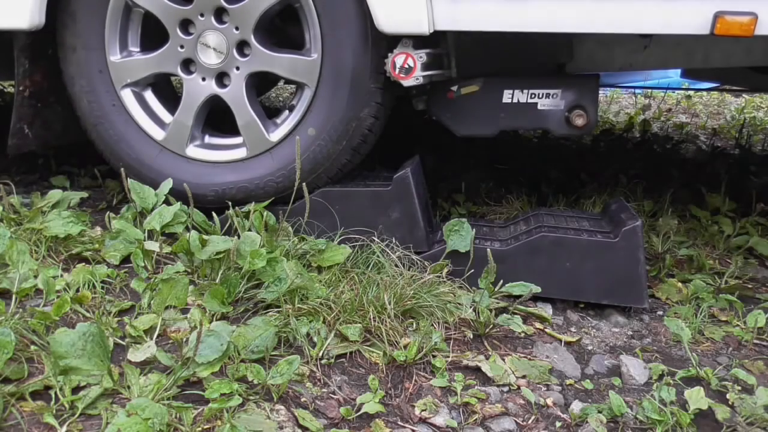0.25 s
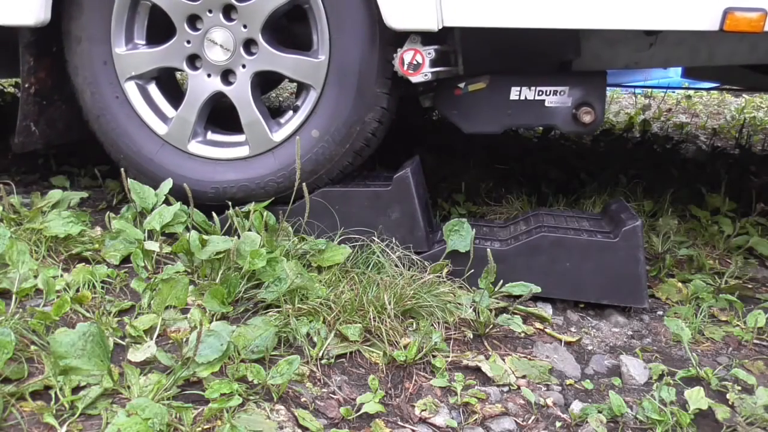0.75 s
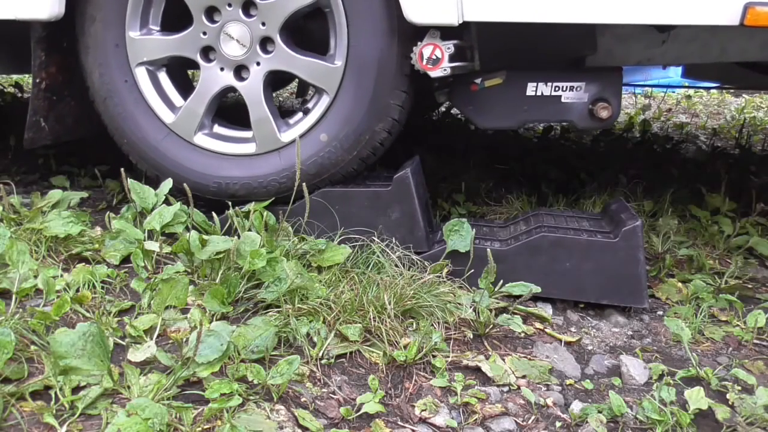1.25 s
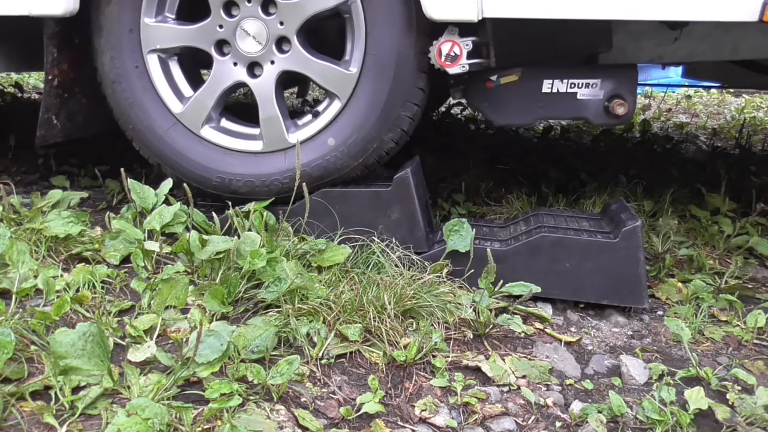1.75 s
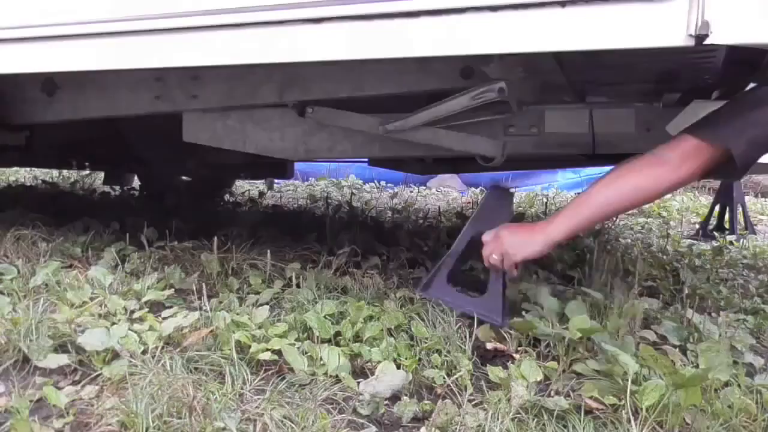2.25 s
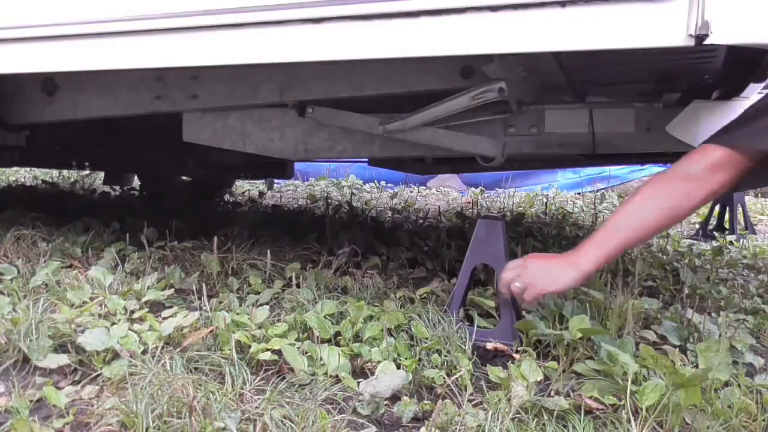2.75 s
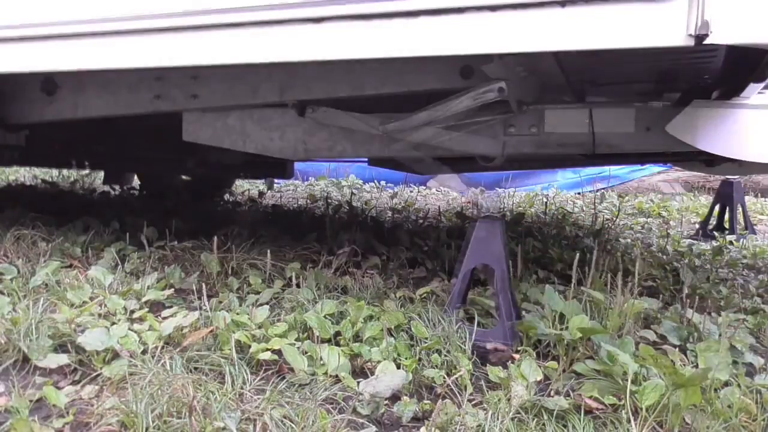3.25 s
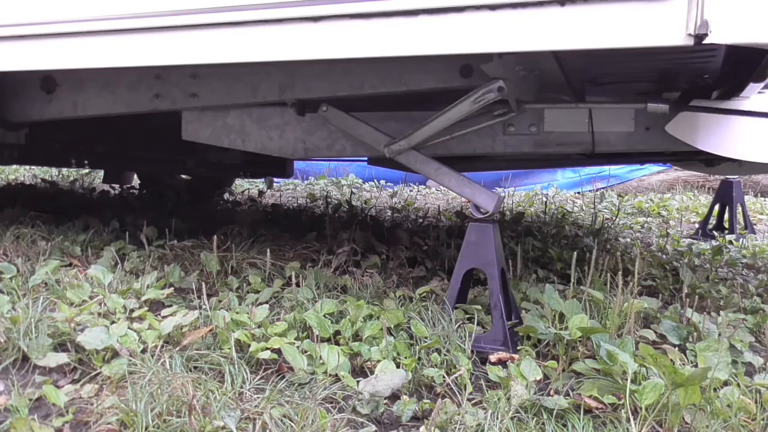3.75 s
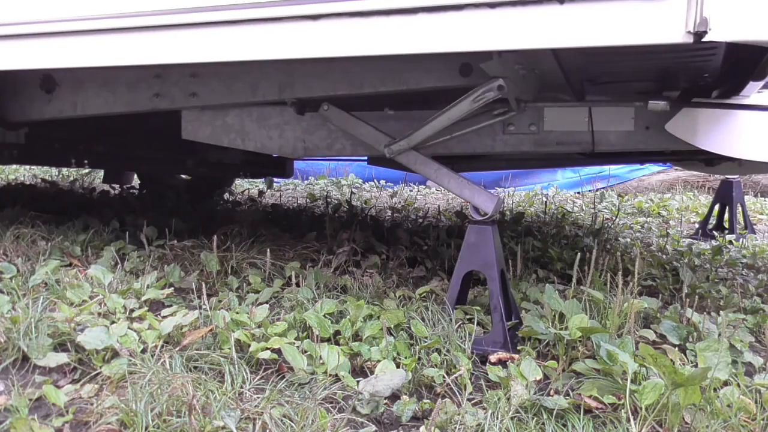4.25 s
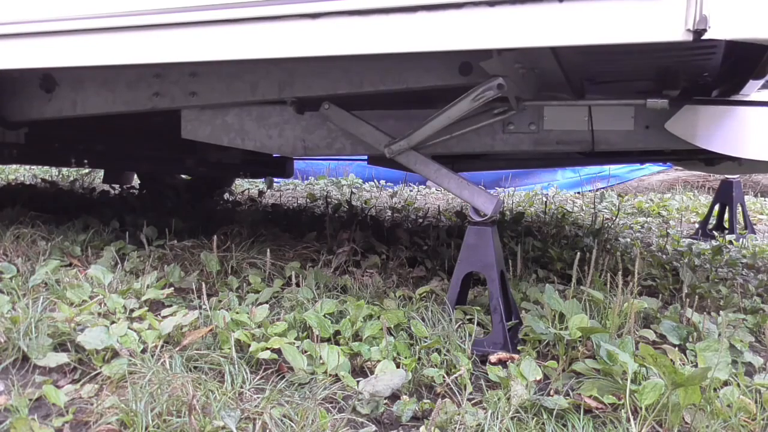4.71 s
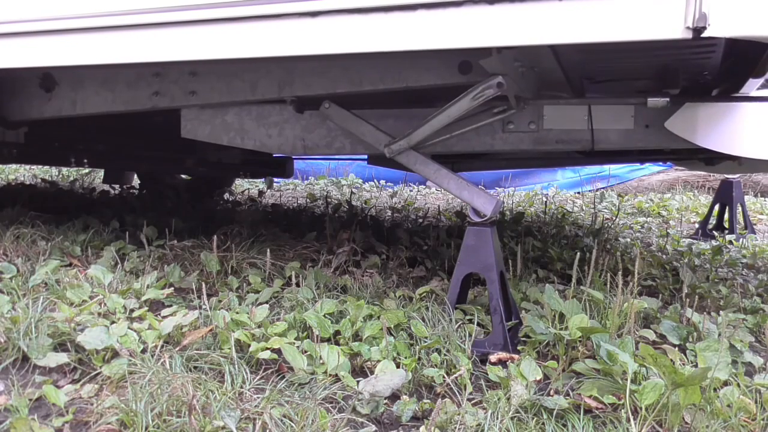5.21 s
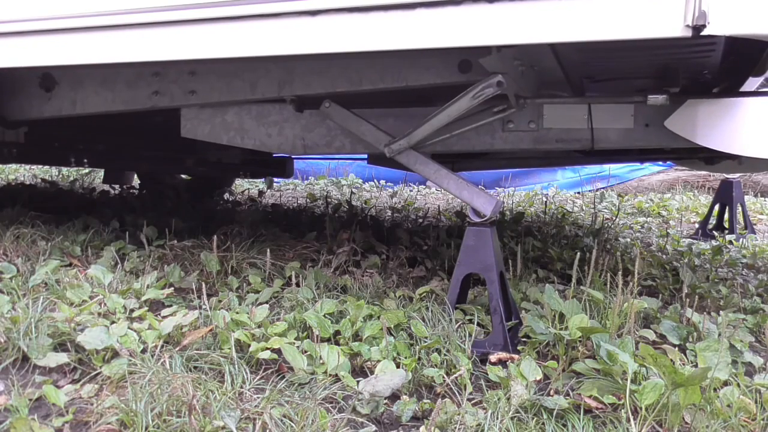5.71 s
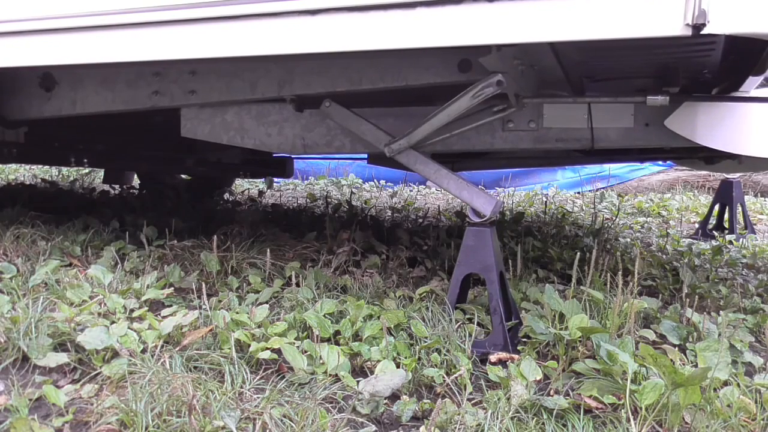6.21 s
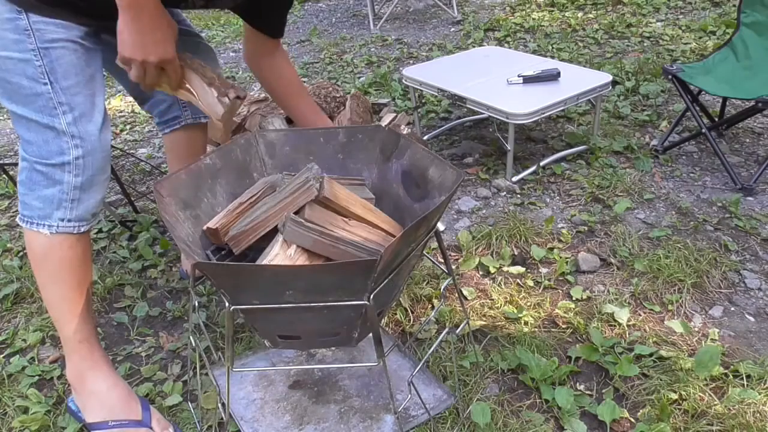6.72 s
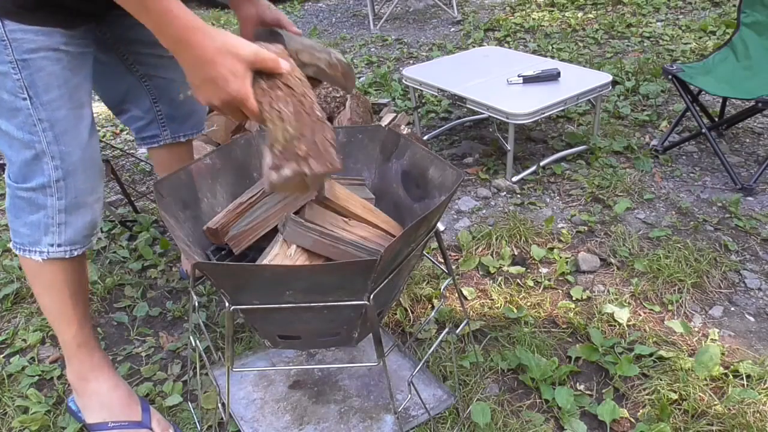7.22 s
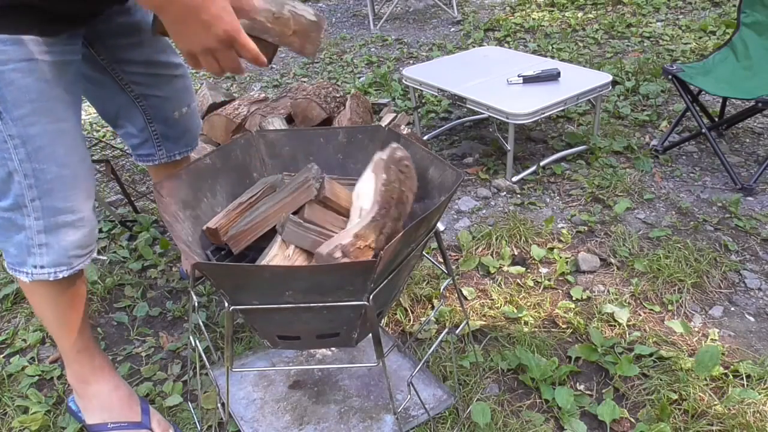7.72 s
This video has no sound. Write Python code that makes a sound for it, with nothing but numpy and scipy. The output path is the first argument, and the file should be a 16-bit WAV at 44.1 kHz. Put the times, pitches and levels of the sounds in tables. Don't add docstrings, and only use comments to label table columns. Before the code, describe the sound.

Close under a parked trailer, a battery motor buzzes while its gear whine climbs, falls and stops. A hollow plastic stand snaps down through weeds. A steel leg is cranked with groans, knocks, handle ticks, low frame thuds and a tiny squeak. Then an abrupt change: wind bumps the microphone, cicadas buzz steadily, and logs clunk and scrape close by.

```python
import sys
import numpy as np
from scipy import signal
from scipy.fft import rfft, irfft, next_fast_len
from scipy.io import wavfile
from scipy.ndimage import uniform_filter1d

SR = 44100
rng = np.random.default_rng(int(sys.argv[2]) if len(sys.argv) > 2 else 0)


def volts(x):
    e = np.asarray(x, float) / 20
    return 10 ** e


def output_pcm(signal):
    pcm = np.clip(np.atleast_2d(signal).T, -1, 1) * 32767
    wavfile.write(sys.argv[1], SR, np.round(pcm).astype(np.int16))


N = 351477
MOTOR_N = 2 * SR
CUT_S = 1.572
TOP_HZ = 1120

# time_s, tooth_rate_hz
GEAR_RUN = [(.15, 330), (.4, 617), (.62, 853), (.93, 1037), (1.12, 1119), (1.2, 1107), (1.31, 939),
            (1.39, 762.5), (1.55, 369.5)]


def evened(x):
    return x / np.sqrt(np.mean(x ** 2) + 1e-20)


def curve(rows, quiet=None, count=N):
    s, *columns = np.transpose(rows)
    return [np.interp(np.arange(count) / SR, s, c, quiet, quiet) for c in columns]


def read(points, hz):
    f, value = np.transpose(points)
    return np.interp(np.log(hz + 1), np.log(f + 1), value)


def coloured(x, points):
    length = x.shape[-1]
    size = next_fast_len(length)
    gain = volts(read(points, np.fft.rfftfreq(size, 1 / SR)))
    return evened(irfft(rfft(x, size) * gain, size)[..., :length])


def resonate(x, hz, width_hz):
    return signal.lfilter(*signal.iirpeak(hz, hz / width_hz, SR), x)


def drift(rate_hz, count=N):
    steps = rng.standard_normal(count // 64 + 2)
    steps = uniform_filter1d(steps, max(int(SR / 128 / rate_hz), 1))
    steps = uniform_filter1d(steps, size=3)
    return evened(np.interp(np.arange(count) / 64, np.arange(len(steps)), steps))


def placed(x, pan_db):
    return np.array([x * volts(pan_db / 2), x * volts(-pan_db / 2)])


def swells(rows):
    t = np.arange(N) / SR
    return [volts(db - 20 * np.minimum(np.maximum((s - t) / rise, (t - s) / fall), 10))
            for s, db, rise, fall in rows]


def add(mix, s, sound):
    part = mix[:, round(s * SR):][:, :sound.shape[-1]]
    part += sound[..., :part.shape[1]]


def singing(rows, count, rough):
    hz = curve(rows, count=count)[0]
    db = curve(rows, -120, count)[1]
    breakup = 1 - rough + rough * drift(14., count)
    return np.sqrt(2) * volts(db) * breakup * np.cos(2 * np.pi * np.cumsum(hz) / SR)


def knocks(hits, modes, rough_db, rough_t60_s):
    out, t = np.zeros((2, N)), np.arange(8192) / SR
    for s, db, spot_hz in hits:
        b, c = rng.standard_normal((2, len(t)))
        reach = [(90, -30), (spot_hz / 2.5, -7), (spot_hz, 0), (spot_hz * 1.9, -6),
                 (spot_hz * 2.8, -28), (16000, -60)]
        blow = coloured(b, reach) * volts(-60 * t / 0.037) * np.minimum(t / 0.00085, 1)
        ringing = sum(volts(mode_db) * resonate(blow, hz, 6.1 / t60_s) * np.sqrt(t60_s)
                      for hz, mode_db, t60_s in modes)
        rough = coloured(c, reach) * volts(rough_db - 60 * t / rough_t60_s) * np.minimum(t / 0.0065, 1)
        add(out, s, volts(db - 2.5) * (ringing / abs(ringing).max() + rough))
    return out


def ticks(hits, tick_t60_s, pan_db, snap, top_db, tail):
    out, t = np.zeros((2, N)), np.arange(8192) / SR
    spectrum = [(1500, -3.0), (3000, -4.5), (6000, 0.0), (9500, 3.0), (12500, top_db), (16000, top_db - 13)]
    shape = snap * volts(-60 * t / 0.0044) + volts(-60 * t / tick_t60_s) + tail * volts(-60 * t / 0.067)
    onset = placed(np.minimum(t / 0.001, 1) ** 2, pan_db)
    for s, db in hits:
        a, c, d = rng.standard_normal((3, len(t)))
        bright = coloured(np.array([a + 0.72 * c, a + 0.51 * d]), spectrum)
        add(out, s, volts(db - 5.5) * bright * shape * onset)
    return out


def thumps(hits):
    out, t = np.zeros((2, N)), np.arange(8192) / SR
    for s, db, hz in hits:
        push = rng.standard_normal(len(t)) * volts(-60 * t / .09)
        thump = resonate(resonate(push, hz, 130), hz, 200)
        thump = signal.lfilter(*signal.butter(2, 65, "high", fs=SR), thump)
        add(out, s, volts(db) * thump / abs(thump).max())
    return out


def rings(rows):
    out, t = np.zeros((1, N)), np.arange(8192) / SR
    rise = 1 - np.exp(-t / 0.00084)
    for s, db, hz, t60_s in rows:
        add(out, s, volts(db - 60 * t / t60_s) * rise * np.sin(2 * np.pi * hz * t))
    return out


def air():
    # start_s, level_db
    place_levels = [(0, 0.5), (1.6, -1), (2.2, 0), (2.95, -2), (3.05, 2), (4.8, .5), (6.1, 2)]
    # freq_hz, correlation
    likeness = [(60, 0.84), (180, 0.89), (550, 0.69), (1650, 0.59), (4970, 0.39), (15000, -0.24)]
    # freq_hz, level_db_per_hz
    wash = [(20, -26), (60, -10.5), (170, -1.5), (300, 0.5), (600, -3), (1400, -7), (1750, -14),
            (2700, -16), (4500, -14.5), (6000, -19), (8300, -16), (12000, -24), (16200, -24.5)]
    level_db, patch_db = -49, 1.4
    frames, hz = N // 256 + 5, np.fft.rfftfreq(1024, 1 / SR)
    a, b, c, d, patches = rng.standard_normal((frames, 513, 5)).T
    patches = evened(uniform_filter1d(uniform_filter1d(patches, 12, 0), 10, 1))
    same = np.clip(read(likeness, hz), -1, 1)[:, None]
    left = a + 1j * b
    z = np.array([left, same * left + np.sqrt(1 - same ** 2) * (c + 1j * d)])
    z *= volts(read(wash, hz)[:, None] + patch_db * patches)
    s, db = np.transpose(place_levels)
    place_db = db[np.searchsorted(s, np.arange(N) / SR, "right") - 1]
    place_db = uniform_filter1d(place_db, size=4000)
    flutter_db = .6 * drift(8.)
    wash_sound = signal.istft(z, nperseg=1024, noverlap=768)[1][:, :N]
    return volts(level_db + place_db + flutter_db) * evened(wash_sound)


def wind():
    # peak_s, level_db, rise_s, fall_s, left_right_db
    puffs = [(6.141, -32, 0.047, 0.18, 6), (6.256, -51, 0.08, 0.38, -6), (6.428, -39.5, 0.25, 0.049, 14),
             (6.54, -40, 0.1, 0.13, -6), (7.2, -46.5, 0.49, 0.25, -14), (7.47, -51, 0.44, 0.61, 0),
             (7.742, -46, 0.073, 0.41, 0)]
    # freq_hz, level_db_per_hz
    turbulence = [(12, -50), (20, -9), (64, 5), (114, 8.5), (177, 4), (300, -9.5), (426, -27), (900, -27),
                  (1170, -55), (1980, -120)]
    # peak_s, level_db, left_right_db
    slaps = [
        (6.149, -24.5, 18),
        (6.409, -29.5, 17),
    ]
    envelopes = swells(row[:4] for row in puffs)
    gusts = sum(placed(gust, row[4]) for gust, row in zip(envelopes, puffs))
    lumps = coloured(rng.standard_normal((2, N)), turbulence) * volts([3.2 * drift(25.), 1.0 * drift(25.)])
    out = lumps * gusts * volts(3.5)
    u = np.arange(-300, 900) / SR / 0.001
    pulse = (1 - u ** 2) * np.exp(-u ** 2 / 2)
    for s, db, side_db in slaps:
        out[:, round(s * SR) - 300:][:, :len(u)] -= placed(volts(db) * pulse, side_db)
    return out


def birds():
    # start_s, length_s, from_hz, to_hz, level_db
    whistles = [
        (2.965, 0.11, 5400, 4900, -60),
        (3.24, 0.09, 3300, 2800, -59),
        (3.4, .1, 3500, 3300, -60),
        (4.317, 0.11, 4050, 3910, -59),
    ]
    out = np.zeros(N)
    for s, length_s, from_hz, to_hz, db in whistles:
        hz = np.linspace(from_hz, to_hz, round(length_s * SR))
        hz = hz + 60 * drift(150., len(hz))
        whistle = np.hanning(len(hz)) * np.sin(2 * np.pi * np.cumsum(hz) / SR)
        out[round(s * SR):][:len(hz)] += volts(db + 2.5) * whistle
    return out


def cicadas():
    # resonance_hz, level_db, left_right_db
    singers = [(6400, 0, -1), (6150, -5, 1), (6800, -5, -2), (7450, -10, 2)]
    burst_rates = [101.62, 101.9, 101.8, 101.7]
    rib_gains = [1, -.8, -.9, -.7]
    # freq_hz, level_db_per_hz
    blur = [(2240, -43), (3800, -24), (4040, -24.5), (5540, -11), (6280, -10), (6520, -2.5), (11200, -29.5),
            (13100, -30), (14000, -37)]
    start_s, rise_s, level_db, swell_db = 6.06, 0.073, -35, 0.63
    near = np.zeros((2, N))
    for rate, (hz, db, pan_db) in zip(burst_rates, singers):
        turns = rate * np.arange(N) / SR + 0.0029 * drift(3.4) + rng.random()
        spacing = .25 + .004 * drift(6.)
        clicks = sum(gain * np.diff((turns - spacing * k) // 1, prepend=0).clip(0, 1)
                     for k, gain in enumerate(rib_gains))
        song = resonate(resonate(resonate(clicks, hz, 170), hz, 700), hz, 2500)
        near += placed(volts(db + 3. * drift(7.)) * evened(song), pan_db)
    far = coloured(rng.standard_normal((2, N)) + 0.23 * rng.standard_normal(N), blur)
    far = far * volts(1.5 * drift(60.))
    rise = np.clip((np.arange(N) / SR - start_s) / rise_s, 0, 1)
    level = volts(level_db + swell_db * drift(4.) + .6)
    return rise * level * (volts(-2.5) * evened(near) + volts(-3.5) * far)


def weeds():
    # peak_s, level_db, rise_s, fall_s
    brushes_past = [
        (1.926, -50, 0.039, 0.054),
        (2.114, -47.5, 0.17, 0.041),
    ]
    grains = volts(4.1 * np.minimum(rng.exponential(1, (2, N)), 5))
    grains = grains * (rng.random((2, N)) < 6000 / SR) * rng.choice([-1, 1], N)
    crackle = coloured(grains, [(2000, -13), (5000, -3.5), (9000, -3), (13000, -9), (16000, -13)])
    return sum(swells(brushes_past)) * crackle


def frame():
    # time_s, pitch_hz, level_db
    hums = [
        [(3.1, 274, -48), (3.114, 275.6, -53), (3.162, 278.6, -47), (3.204, 260, -35), (3.232, 282, -48),
         (3.264, 262, -42), (3.274, 247, -45), (3.284, 231, -39), (3.3, 229, -47)],
        [(3.64, 240, -31), (3.644, 239, -42), (3.672, 246, -26.5), (3.694, 242.8, -47), (3.77, 285, -42),
         (3.814, 246.4, -46), (3.826, 246.6, -30), (3.892, 251, -45), (3.95, 267, -58)],
    ]
    # time_s, pitch_hz, level_db
    brace_low = [(3.36, 745, -62), (3.4, 745, -54), (3.5, 750, -61), (3.6, 750, -51), (3.68, 740, -52),
                 (3.75, 740, -52), (3.8, 745, -50), (3.88, 745, -59)]
    # time_s, pitch_hz, level_db
    brace_high = [(3.49, 1590, -66), (3.515, 1575, -51), (3.55, 1575, -62), (3.585, 1570, -55),
                  (3.66, 1560, -61), (3.69, 1585, -55), (3.72, 1585, -66)]
    hum = sum(singing(rows, N, 0.084) for rows in hums)
    return hum + singing(brace_low, N, 0.26) + singing(brace_high, N, 0.24)


def frame_thuds():
    # start_s, level_db, pitch_hz
    loads = [(2.159, -43, 168), (3.25, -28, 266), (3.289, -31.5, 180), (3.33, -36, 110), (3.512, -38, 220),
             (3.593, -28.5, 110), (3.615, -29.5, 98), (3.636, -17.5, 296), (3.662, -31, 254),
             (3.756, -39, 290), (3.82, -29.5, 240), (4.084, -28, 227), (4.092, -31, 75), (4.099, -23, 208),
             (4.405, -40, 284), (4.506, -25, 161), (4.624, -38, 159), (4.644, -29.5, 278),
             (4.693, -34.5, 146.6), (4.908, -39, 226), (4.934, -39.5, 165), (4.975, -41, 200),
             (5.098, -23, 155), (5.11, -31, 330), (5.337, -38, 205.2), (5.369, -37.5, 183),
             (5.41, -40, 308), (5.424, -31, 110), (5.535, -37.5, 310), (5.44, -35, 115), (3.45, -37, 120),
             (3.44, -42, 270)]
    return thumps(loads)


def bark():
    # time_s, level_db
    scrape = [(7.17, -70), (7.294, -49), (7.395, -75), (7.41, -40), (7.576, -37.5), (7.75, -50)]
    # freq_hz, level_db_per_hz
    colour = [(88, -50), (150, -9), (367, -3), (451, 3), (732, -5.5), (835, -3), (1930, -17.5),
              (5000, -21.5), (6500, -57), (11000, -120)]
    grains = volts(2.0 * np.minimum(rng.exponential(1, N), 5))
    grains = grains * (rng.random(N) < 1200 / SR) * rng.standard_normal(N)
    return volts(curve(scrape, -120)[0] + 2.0 * drift(50.)) * coloured(grains, colour)


def logs():
    # start_s, level_db, spot_pitch_hz, tick_over_blow_db
    blows = [(6.322, -35, 1240, -8), (7.193, -19.5, 1110, -1.5), (7.204, -18, 530, -9),
             (7.228, -25.5, 600, -9), (7.249, -22.5, 567, -14), (7.273, -39, 781, -11),
             (7.408, -29, 1500, -4.5), (7.488, -32.5, 1490, -3), (7.545, -39, 587, -3),
             (7.565, -21.5, 440, -19), (7.58, -28, 444, -4.5), (7.592, -22, 537, -16),
             (7.618, -24.5, 523, -9), (7.639, -42, 654, -3)]
    # freq_hz, level_db, t60_s
    modes = [(330, -4, 0.037), (493, -7, 0.12), (580, -7, 0.088), (865, -8.5, 0.044), (1240, 0, 0.026),
             (1460, -2, 0.04), (2150, -4, .025)]
    # start_s, level_db
    splinters = [
        (7.857, -32),
        (7.953, -42),
    ]
    # start_s, level_db, pitch_hz, t60_s
    clean = [(7.194, -21, 850, 0.05), (7.195, -18, 1190, 0.026), (7.197, -28.5, 4170, 0.073),
             (7.195, -30, 2100, .04), (7.413, -31, 1500, 0.048), (7.413, -35, 2190, 0.032),
             (7.49, -32, 1530, .05), (7.49, -31, 830, 0.045), (7.615, -27, 980, .05),
             (7.638, -33, 600, 0.035)]
    thump_db, thump_hz = -16.5, 200
    s, db, hz, tick_db = np.transpose(blows)
    snaps = ticks(list(zip(s, db + tick_db)) + splinters, 0.18, -1.8, 0.35, -6.0, 0.63)
    pushes = thumps(zip(s, db + thump_db, thump_hz + 0 * s))
    return knocks(zip(s, db, hz), modes, -11.0, 0.27) + snaps + pushes + rings(clean)


def stand():
    # start_s, level_db, spot_pitch_hz
    blows = [
        (2.159, -31, 730),
        (2.177, -26, 895),
        (2.215, -29, 900),
    ]
    # freq_hz, level_db, t60_s
    modes = [(694, 0, .05), (1000, 0, .05), (1405, 0, .05)]
    # start_s, level_db
    contacts = [
        (2.153, -31),
        (2.1595, -13.5),
        (2.177, -32),
    ]
    # start_s, level_db, pitch_hz, t60_s
    clean = [(2.152, -42, 785, .05), (2.1595, -28, 694, 0.19), (2.161, -34, 2310, 0.086),
             (2.176, -31.5, 2300, 0.044), (2.160, -49, 1360, 0.054), (2.176, -28, 800, 0.034),
             (2.160, -18, 9329, 0.018), (2.160, -14, 6200, 0.017), (2.160, -19, 7550, .035),
             (2.160, -14, 10500, 0.021), (2.160, -35, 4600, 0.069), (2.215, -34, 713, 0.11),
             (2.215, -35, 916, 0.041), (2.216, -35, 1420, 0.028)]
    return knocks(blows, modes, -9, 0.063) + ticks(contacts, 0.032, -2, 2.6, 3.8, 0.37) + rings(clean)


def leg():
    # start_s, level_db, spot_pitch_hz
    blows = [(2.795, -42, 820), (3.074, -43, 1050), (3.189, -40, 748), (3.289, -35, 1100),
             (3.512, -31, 600), (3.615, -13, 1100), (3.636, -28, 533), (3.662, -39, 662), (3.756, -34, 770),
             (4.084, -20, 710), (4.099, -43, 748), (4.366, -39.5, 920), (4.405, -41, 721),
             (4.495, -30.5, 643), (4.506, -27, 567), (4.536, -38, 547), (4.644, -48, 550),
             (4.765, -44, 640), (4.859, -38.5, 1410), (4.908, -37, 564), (5.098, -22.5, 700),
             (5.139, -35, 740), (5.529, -37.5, 1100)]
    # freq_hz, level_db, t60_s
    modes = [(382, 13.4, 0.014), (600, 12.6, 0.35), (740, 10.3, 0.2), (1100, 3.9, 0.065), (1254, 11, 0.12),
             (1580, 3.8, 0.28), (2580, 23.6, 0.019)]
    # start_s, level_db
    handle = [(3.189, -43), (3.615, -17), (3.738, -43), (3.756, -43), (4.366, -46), (4.538, -32),
              (4.859, -35.5), (5.098, -47), (5.139, -30.5), (5.337, -44.5)]
    # start_s, level_db, pitch_hz, t60_s
    clean = [(3.27, -41, 1340, 0.1), (3.272, -35.5, 788, 0.075), (3.617, -29, 1030, 0.08),
             (3.639, -37, 1594, 0.13), (3.616, -21, 8640, 0.025), (3.615, -15, 6940, 0.016),
             (3.616, -28.5, 3510, 0.064), (3.757, -28.5, 750, 0.085), (3.76, -37.5, 1570, 0.097),
             (3.771, -37.5, 6900, 0.041), (4.085, -29, 1025, .08), (4.085, -26.5, 692, 0.12),
             (4.085, -33.5, 1297, 0.054), (4.111, -38, 153, 0.28), (4.367, -36, 985, .05),
             (3.513, -39, 600, 0.046), (4.498, -36, 1220, 0.031), (4.644, -31.5, 518, 0.09),
             (4.91, -42, 576, 0.038), (5.14, -31, 11660, .03), (5.1, -35, 1016, .06),
             (5.53, -39.5, 990, 0.097), (5.532, -40, 1260, 0.05)]
    return knocks(blows, modes, -1.0, 0.075) + ticks(handle, 0.015, -1.8, 1.0, -7.5, 0.86) + rings(clean)


def crank():
    # peak_s, groan_db, rise_s, fall_s
    strokes = [(3.195, -35, 0.047, 0.081), (3.27, -37, 0.092, 0.07), (3.5, -43.5, 0.38, 0.43),
               (3.665, -29, 0.18, 0.052), (3.76, -29, 0.11, 0.09), (3.86, -33, 0.083, 0.025)]
    # freq_hz, width_hz
    groan_mode = (276, 52)
    # freq_hz, width_hz
    rumble_mode = (110, 51)
    # freq_hz, level_db_per_hz
    rub_colour = [(300, 0.5), (500, 7), (750, 0), (1100, 2), (1570, -7), (2200, -12.5), (9000, -18.5),
                  (15000, -25)]
    rub_db, rub_slip_db, rub_share = -44, 2.5, 0.46
    rumble_db, rumble_share, rumble_lag_s = -51, 0.47, 0.036
    push = sum(swells(strokes))
    effort = push / push.max()
    turning = np.minimum(effort / .02, 1)
    groan = resonate(resonate(rng.standard_normal(N), *groan_mode), *groan_mode)
    groan = volts(-9.0) * push * evened(groan)
    late = np.roll(turning * effort ** rumble_share, round(rumble_lag_s * SR))
    rumble = resonate(resonate(rng.standard_normal(N), *rumble_mode), *rumble_mode)
    rumble = volts(rumble_db) * late * evened(rumble)
    slips = volts(rub_db + rub_slip_db * drift(40.))
    rub = slips * turning * effort ** rub_share * coloured(rng.standard_normal(N), rub_colour)
    return groan + rumble + rub


def squeak():
    # peak_s, level_db, rise_s, fall_s
    grips = [
        (4.549, -40, 0.013, 0.019),
    ]
    pitch_hz, rise_hz_per_s, partials_db = 3050, 2500, [1, -0.5, 8]
    top_decay = 1.6
    (s, top_db, rise, fall), = grips
    u = np.arange(N) / SR - s
    grip = volts(top_db - 20 * np.minimum(np.where(u < 0, u / rise, u / fall) ** 2, 10))
    slip = 2 * np.pi * (pitch_hz * u + rise_hz_per_s * u * np.minimum(u, 0) / 2)
    top_grip = grip * (grip / grip.max()) ** ((top_decay - 1) * (u > 0))
    shapes = [grip, grip, top_grip]
    tone = sum(volts(db + 3.5) * shape * np.cos((k + 1) * slip)
               for k, (db, shape) in enumerate(zip(partials_db, shapes)))
    return placed(tone, -6.0)


def gears_moving(from_s, to_s, count):
    t = np.arange(count) / SR
    return uniform_filter1d(1. * (t > from_s) * (t < to_s), size=4000)


def motor_case():
    # freq_hz, width_hz, level_db
    bands = [(3270, 90, -63), (4170, 160, -60), (4420, 130, -60), (5000, 200, -63), (6580, 120, -66),
             (7710, 150, -57), (8040, 120, -65), (9180, 180, -61), (11600, 200, -65)]
    spark_db, idler_order, idler_db = 1.5, 1.43, -57
    hz = curve(GEAR_RUN)[0]
    moving = gears_moving(GEAR_RUN[1][0] - .12, GEAR_RUN[-1][0] - .1, N)
    sparks = rng.standard_normal((2, N)) + 0.84 * rng.standard_normal(N)
    sparks = volts(spark_db * drift(60.)) * sparks
    ringing = sum(volts(db + 2.2 * drift(8.)) * evened(resonate(sparks, f, width)) for f, width, db in bands)
    idler_turn = 2 * np.pi * idler_order * np.cumsum(hz * (1 + .006 * drift(50.))) / SR
    idler = volts(idler_db + 4 * drift(12.)) * np.cos(idler_turn)
    relay = ticks([(1.563, -44)], .03, 0, 0.54, -8, 0.34)
    return moving * volts(2.3 * np.log2(hz / TOP_HZ)) * (volts(-1.5) * ringing + idler) + relay


def since_cut_s():
    return np.maximum(np.arange(MOTOR_N) / SR - CUT_S, 0)


def switched_off():
    return np.minimum(since_cut_s() / .012, 1)


def drive_db():
    # time_s, buzz_db
    drive = [(0.0, -32), (0.03, -29), (0.114, -31.5), (0.224, -29), (0.402, -31), (0.746, -34.5),
             (1.264, -36.5), (1.446, -31.5), (1.56, -29.5)]
    drop_db, coast_db_per_s = -13, -130
    return curve(drive, count=MOTOR_N)[0] + drop_db * switched_off() + coast_db_per_s * since_cut_s()


def chopper_buzz(buzz_db):
    # multiple, level_db
    chop_orders = [(1, -47.5), (2, -41), (3, -43), (4, -49), (5, -46), (6, -49)]
    # chopper_multiple, side, level_db
    sidebands = [(0, 1, -54), (1, 1, -49.5), (3, -1, -47), (4, -1, -53.5), (5, -1, -44.5), (6, -1, -41)]
    # freq_hz, level_db_per_hz
    housing = [(18, -53), (30, -12), (107, -5.5), (187, 2), (223, 1.5), (303, -5), (334, -5), (618, 1),
               (721, -6), (1260, -15), (3000, -33), (3900, -81), (6600, -120)]
    chop_hz, rotor_hz = 113.05, 59.2
    t = np.arange(MOTOR_N) / SR
    chop = 2 * np.pi * (chop_hz * t + 0.023 * drift(6.8, MOTOR_N))
    rotor = 2 * np.pi * (rotor_hz * t + 0.18 * drift(7.3, MOTOR_N))
    lines = [(k * chop, db) for k, db in chop_orders]
    lines += [(round(k) * chop + round(side) * rotor, db) for k, side, db in sidebands]
    tones = evened(sum(volts(db + 2.5 * drift(8., MOTOR_N)) * np.cos(phase + 4.57 * rng.random())
                       for phase, db in lines))
    kicks = .8 + np.exp(-(chop / (2 * np.pi) % 1) / .3)
    rattle = coloured(kicks * rng.standard_normal(MOTOR_N), housing)
    return volts(buzz_db) * (volts(-.5) * tones + volts(-10) * rattle)


def chassis_beams(buzz_db, tooth_hz):
    # freq_hz, width_hz, level_db
    chassis = [(750, 12, -20), (1232, 11, -27), (1218, 11, -30)]
    # time_s, pitch_hz, level_db
    long_beam = [(0.0, 1240, -43.5), (0.33, 1227, -59), (0.34, 1223, -66), (0.384, 1218, -41),
                 (0.476, 1232, -50), (1.276, 1231, -50), (1.324, 1219, -56), (1.432, 1211, -46.5),
                 (1.7, 1227, -49)]
    # time_s, pitch_hz, level_db
    floor_panel = [(0.0, 224, -28), (0.414, 225.0, -39.5), (0.622, 227, -29), (0.712, 225.1, -44),
                   (0.952, 225.7, -31), (1.118, 218.7, -46), (1.216, 229.4, -38), (1.55, 228.4, -28),
                   (1.6, 234.6, -60)]
    kick_db, reach_hz = 4, 250
    t = np.arange(MOTOR_N) / SR
    shake = volts(0.19 * buzz_db - 23.5) * (t < 1.59) * rng.standard_normal(MOTOR_N)
    out = np.zeros(MOTOR_N)
    for f, width, db in chassis:
        kick = 1 + volts(kick_db) / (1 + ((2 * tooth_hz - f) / reach_hz) ** 2)
        out += volts(db) * resonate(shake * kick, f, width) * np.sqrt(SR / width / np.pi)
    out += 1.6 * singing(long_beam, MOTOR_N, .3) * volts(-60 * since_cut_s())
    return out + .6 * singing(floor_panel, MOTOR_N, .25)


def brush_hiss(octaves, moving):
    # freq_hz, level_db_per_hz
    brushes = [(1350, -3.5), (2300, -13), (2960, -17.5), (3290, -15), (6090, -18), (7900, -15),
               (11900, -21), (16000, -38)]
    level_db, db_per_octave, rest_db = -41.5, 5.5, -89
    level = volts(level_db + db_per_octave * octaves) * moving + volts(rest_db) * (1 - switched_off())
    noise = rng.standard_normal((2, MOTOR_N)) + 2.2 * rng.standard_normal(MOTOR_N)
    return level * coloured(noise, brushes)


def casing(hz):
    # freq_hz, width_hz, level_db
    modes = [(520, 80, 1), (620, 80, 3), (765, 60, 0), (930, 50, 1), (1045, 40, -2), (1115, 40, 3),
             (1230, 60, 4), (1535, 60, 3), (1850, 70, 5), (2190, 90, 3)]
    return np.sqrt(sum(volts(2 * db) / (1 + (2 * (hz - f) / width) ** 2) for f, width, db in modes))


def gear_whine(tooth_hz, octaves, moving):
    # partial, freq_hz, width_hz, level_db
    gearbox = [(3, 2150, 150, -16), (3, 2590, 140, -15), (3, 3270, 130, -16.5), (4, 4450, 250, -23),
               (5, 4900, 250, -27)]
    mesh_db, mesh_db_per_octave = -32.5, -6.5
    slow = np.clip(.32 - octaves, 0, 1)
    mesh = 2 * np.pi * np.cumsum(tooth_hz * (1 + .012 * slow * drift(70., MOTOR_N))) / SR
    whine = np.zeros(MOTOR_N)
    for k, db, rough in [(1, -8.5, .75 * slow), (2, -12, .4 * slow)]:
        level = volts(db + (k + 2) * octaves + 1.5 * drift(9., MOTOR_N)) * casing(k * tooth_hz)
        breakup = 1 - rough + .5 * rough * drift(25., MOTOR_N) + rough * drift(150., MOTOR_N)
        whine += level * breakup * np.cos(k * mesh)
    uneven = .25 + .8 * drift(250., MOTOR_N)
    for k, f, width, db in gearbox:
        whine += volts(db) * resonate(resonate(uneven * np.cos(k * mesh), f, width), f, width)
    return np.sqrt(2) * volts(mesh_db + mesh_db_per_octave * octaves) * moving * whine


def motor():
    buzz_db = drive_db()
    tooth_hz = curve(GEAR_RUN, count=MOTOR_N)[0]
    octaves = np.log2(tooth_hz / TOP_HZ)
    moving = gears_moving(GEAR_RUN[0][0], GEAR_RUN[-1][0] - .06, MOTOR_N)
    out = chopper_buzz(buzz_db) + chassis_beams(buzz_db, tooth_hz)
    out = out + gear_whine(tooth_hz, octaves, moving) + brush_hiss(octaves, moving)
    return np.pad(out, [(0, 0), (0, N - MOTOR_N)])


def underside(x):
    t = np.arange(8000) / SR
    taps = rng.choice([-1., 1.], (2, len(t))) * (rng.random((2, len(t))) < .05)
    taps = taps * volts(-60 * t / 0.088) * (t > .002)
    return signal.fftconvolve(x, taps / np.linalg.norm(taps[0]), axes=1)[:, :N]


def scene():
    near = weeds() + birds() + frame_thuds() + bark() + logs()
    near = near + stand() + leg() + crank() + squeak() + motor()
    return near + volts(-13.0) * underside(near) + air() + wind() + cicadas() + frame() + motor_case()


def masked(x):
    masked_db, floor_db, chance_db, spares_low_db = -30, -26.5, 5, 3.5
    hz, t, z = signal.stft(x, SR, nperseg=1024, noverlap=768)
    power = uniform_filter1d((abs(z) ** 2).sum(0), size=12, axis=0)
    power_db = 10 * np.log10(uniform_filter1d(power, size=40, axis=1) + 1e-16)
    under_db = np.maximum(power_db - power_db[hz > 4000].max(0), floor_db)
    chance = np.kron(rng.standard_normal((len(t) // 7 + 1, 103)), np.ones((7, 5)))
    chance = chance[:len(t), :len(hz)].T
    heard_db = under_db + chance_db * chance + spares_low_db * (hz < 5000)[:, None]
    keep = (heard_db > masked_db) | (hz < 2000)[:, None]
    return signal.istft(z * keep, SR, nperseg=1024, noverlap=768)[1][:, :N]


def band_limit(x):
    return signal.sosfilt(signal.butter(12, 15830, fs=SR, output="sos"), x)


def record(dry):
    low_pass = signal.firwin(301, 15850, window=("kaiser", 9), fs=SR)
    limited = signal.oaconvolve(dry, low_pass[None], "same")
    return band_limit(masked(limited))


dry = scene()
out = record(dry)
output_pcm(out)
```